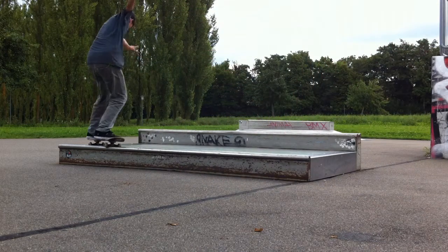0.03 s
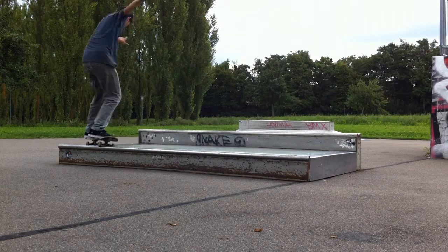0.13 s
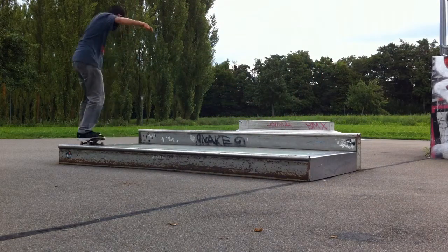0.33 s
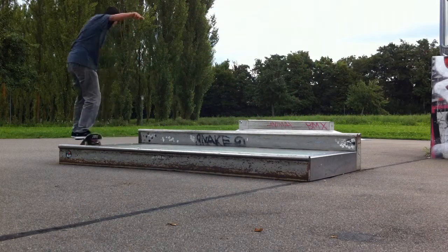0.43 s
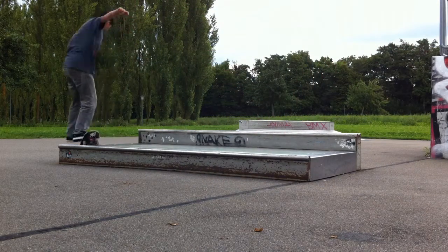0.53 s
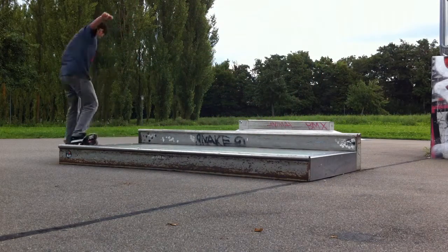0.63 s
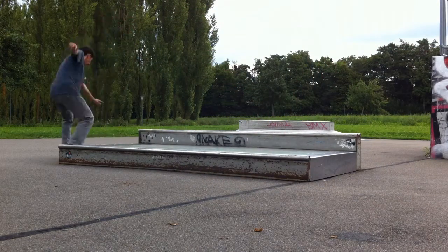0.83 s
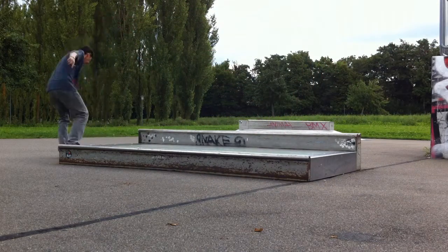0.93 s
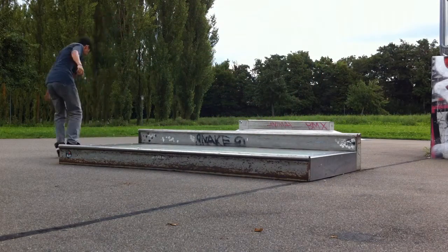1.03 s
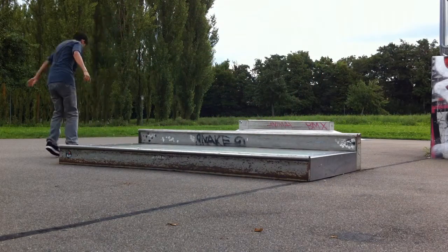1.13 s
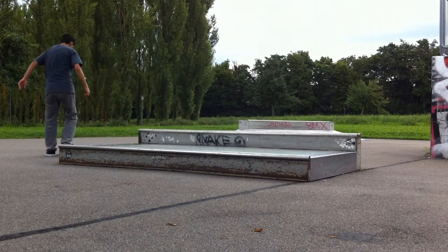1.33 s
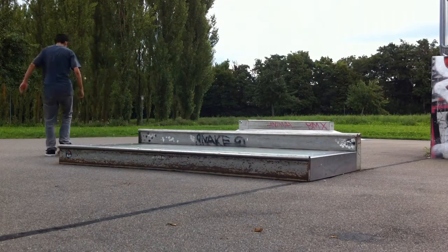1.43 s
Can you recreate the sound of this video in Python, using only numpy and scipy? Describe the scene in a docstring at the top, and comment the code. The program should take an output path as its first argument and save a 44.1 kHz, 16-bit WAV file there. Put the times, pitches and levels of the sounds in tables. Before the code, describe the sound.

Skateboard clacking and scraping along a hollow ledge, then thuds as the rider steps off.

```python
"""An open skatepark, the microphone several metres from a low, hollow concrete ledge.
A skateboard's trucks knock down on the edge and the ledge booms; the board scrapes on over grit,
its wheels stick and slip in a short rising squeal, and it stalls. Board and shoes clack and thud
as the rider steps off. Ramps and trees return a dull echo; a faint hiss lies under everything."""
import sys
import numpy as np
from scipy import signal
from scipy.fft import rfft, irfft
from scipy.io import wavfile
from scipy.ndimage import uniform_filter1d

SR = 44100
rng = np.random.default_rng(int(sys.argv[2]) if len(sys.argv) > 2 else 0)


def transcribe(signal):
    """Save signal, clipped to [-1, 1], as a 16-bit WAV file at the path in sys.argv[1]."""
    frames = np.atleast_2d(signal).T
    limited = np.clip(frames, -1, 1)
    pcm = np.round(limited * 32767).astype(np.int16)
    wavfile.write(sys.argv[1], SR, pcm)


N = 66150
TIME = np.arange(N) / SR
CRUNCH_TOP_HZ = 2880   # upper edge of the clacks' tick and of the grit

# Board and shoes hitting the ledge: t/s, clack level/dB, boom level/dB, boom centre f/Hz,
# deck ring f/Hz, ring re clack/dB, clack top f/Hz, rattle trim/dB, rattle t60/s
KNOCKS = [(0.001, -54, -53, 149, 1050, -7, 1500, 6, 0.11),
          (0.2316, -36, -37, 300, 845, 2, 1390, 2.5, 0.069),
          (0.2429, -34, -58, 282, 1030, -1, 1170, 7.5, 0.073),
          (0.2534, -34.5, -32.5, 285, 686, -5, 755, -16, 0.065),
          (0.2859, -33, -28.5, 286.6, 703, 11, 1450, 3.5, 0.1),
          (0.2916, -40, -27.5, 324, 900, 14, 1130, 0, 0.12),
          (0.3140, -35, -31, 240, 720, 0.5, 1070, 4, 0.16),
          (0.3840, -54, -33.5, 259, 866, 16, 990, 4, 0.06),
          (0.4120, -42.5, -39.5, 280, 800, 6, 1210, -4, 0.059),
          (0.665, -63.5, -42, 142.5, 690, 5, 900, 9.5, 0.096),
          (0.736, -51, -53.5, 210, 1020, 2, 1310, 5, 0.032),
          (0.826, -33.5, -41.5, 303, 1065, 6, 1760, -4, 0.062),
          (0.9470, -45.5, -43.5, 228, 934, 3, 1270, 4, 0.092),
          (0.9501, -36.5, -40, 220, 1285, 11, 1370, -2.5, 0.032),
          (0.955, -38, -49, 225, 627, 5.5, 1390, -2, 0.13),
          (0.9870, -53, -50, 158, 1380, -0.5, 1380, 12, 0.091),
          (1.098, -41, -57, 246, 765, -4, 1480, 5.5, 0.073),
          (1.1116, -35, -56, 377, 990, 6, 1278, -4.5, 0.047),
          (1.138, -47, -43, 220, 650, 9, 1180, 0, 0.044),
          (1.1557, -48, -51.5, 309, 950, -8, 1475, -10, 0.06),
          (1.1811, -45, -71, 303, 532, 5.5, 1410, 2.5, 0.1),
          (1.189, -42.5, -43.5, 181, 1280, 5, 1300, -3, 0.075),
          (1.2078, -49.5, -57, 180, 740, 13, 1170, 2.5, 0.054)]
def clacks():
    """Each hit is a sharp pulse and a dying rattle of the board's parts; both ring the deck briefly."""
    rattle_db, tick_db, ring_width_hz = -17.5, -31, 90
    out, click = np.zeros(N), signal.unit_impulse(N)
    for s, db, _, _, ring_hz, ring_db, top_hz, trim_db, rattle_t60 in KNOCKS:
        rattle = from_db(rattle_db + trim_db) * rng.standard_normal(N) * decay(rattle_t60) / 2
        force = cut(click, 430, "high") + cut(rattle, 288, "high")
        resonance = signal.iirpeak(ring_hz, ring_hz / ring_width_hz, fs=SR)
        deck = force + from_db(ring_db) * signal.lfilter(*resonance, force)
        clack = cut(deck, top_hz, "low", order=7)
        tick = from_db(tick_db) * cut(deck, CRUNCH_TOP_HZ, "low", order=4)
        pulse_peak = cut(click, top_hz, "low", order=7).max()
        add(out, s, -from_db(db) * (clack + tick) / pulse_peak)
    return out


# Modes of ledge and deck ringing together: f/Hz, relative level/dB, t60/s
LEDGE_MODES = [(135.1, -18, 0.71), (169.6, -6, 0.22), (209.5, -12, 0.2), (251.8, -8, 0.2),
               (284.5, -5, 0.24), (307.4, -15.5, 0.32), (355, -20, 0.32), (415, -16.5, 0.37),
               (457.5, -10.5, 0.31), (598.7, -4.5, 0.2), (658.6, 0.5, 0.2), (696, -3, 0.22),
               (790, -1.5, 0.2), (868, -9, 0.3), (920, -18, 0.17), (1012, -17.5, 0.62)]
def booms():
    """Each hit thuds in the deck and rings the ledge; the contact point favours modes near one pitch."""
    spread_db, off_centre_db_per_oct, thud_db = 1.5, -12, -8
    out = np.zeros(N)
    chance_db = spread_db * rng.standard_normal((len(KNOCKS), len(LEDGE_MODES)))
    for k, (hz, mode_db, t60) in enumerate(LEDGE_MODES):
        strikes = np.zeros(N)
        for (s, _, boom_db, centre_hz, *_), uneven_db in zip(KNOCKS, chance_db[:, k]):
            focus_db = off_centre_db_per_oct * np.abs(np.log2(hz / centre_hz))
            strikes[int(s * SR)] += from_db(boom_db + mode_db + focus_db + uneven_db)
        out += ring(strikes, hz, t60) / 2
    for s, _, boom_db, centre_hz, *_ in KNOCKS:
        thud = ring(signal.unit_impulse(N), centre_hz, t60=.09)
        add(out, s, from_db(boom_db + thud_db) * thud)
    return cut(out, 1300, "low", order=3)   # urethane softens the contact


# Wheels and trucks rubbing along the ledge: t/s, level/dB, centre f/Hz
RUB_CURVE = [(0, -61.5, 186), (.08, -72, 213), (.21, -70, 205), (.26, -54.5, 267), (.33, -43, 238),
             (.46, -48.5, 273), (.52, -54, 173), (.61, -59, 176), (.645, -64, 185), (.70, -60, 146),
             (.735, -66, 168), (.77, -60, 138), (.81, -59.5, 154), (.925, -65, 184), (1.0, -52, 152),
             (1.06, -57, 154), (1.10, -56.5, 161), (1.19, -61.5, 171), (1.23, -68, 157), (1.29, -72, 155),
             (1.33, -80, 238), (1.5, -74.5, 220)]
def rumble():
    """Rough concrete under the board keeps the ledge's modes rumbling, damped by the rider's weight."""
    off_centre_db_per_oct, floor_db = -21.5, -37.5
    level_db, centre_hz = in_time(RUB_CURVE)
    bumps = np.tile(grains(per_s=900, spread_db=3.5), 2)   # the first half lets the ringing build up
    body = np.zeros(N)
    for hz, db, _ in LEDGE_MODES:
        focus_db = np.maximum(off_centre_db_per_oct * np.abs(np.log2(hz / centre_hz)), floor_db)
        body += from_db(db + focus_db) * unit_rms(ring(bumps, hz, t60=.1)[N:])
    steady = body / np.sqrt(uniform_filter1d(body ** 2, size=1800) + 1e-20)
    waver_db = -0.5 * drift(rate_hz=22.8)
    return from_db(level_db + waver_db) * steady


# The trucks' scrape along the edge: t/s, level/dB
SCRAPE_CURVE = [(0, -58), (.07, -82.5), (.2, -83), (.225, -62.5), (.30, -45.5), (.36, -59), (.45, -58.5),
                (.53, -61.5), (.62, -83), (.72, -72.5), (.92, -75), (1.07, -90), (1.125, -50), (1.17, -60),
                (1.24, -86), (1.32, -82.5), (1.5, -75)]
# Its spectrum: f/Hz, relative level/dB
SCRAPE_SPECTRUM = [(60, -54), (130, 6), (330, 0.5), (500, 4.5), (800, -1), (1250, -3.5), (1650, -26),
                   (1970, -14), (2400, -27.5), (5000, -31), (12000, -68)]
def scrape():
    """Grit is crushed between the trucks and the edge in a dense stream of tiny clicks."""
    level_db, = in_time(SCRAPE_CURVE)
    return from_db(level_db) * coloured(grains(per_s=1800, spread_db=4.0), SCRAPE_SPECTRUM)


# Steps of the wheels' squeal: t/s, length/s, first f/Hz, last f/Hz, level/dB
SQUEALS = [(0.4, 0.034, 780, 741, -52.5), (.42, 0.0643, 554.4, 630, -50), (0.47, 0.033, 676, 711, -52.5),
           (0.496, 0.049, 767, 853, -56), (0.538, .1, 817.5, 784, -69.5)]
def squeal(start, length, from_hz, to_hz, level_db):
    """A wheel dragged sideways sticks and slips: a short, slightly rough glide with a weak octave."""
    fade_s, octave_db = 0.01, -20.5
    end = start + length
    glide_hz = np.interp(TIME, [start, end], [from_hz, to_hz])
    jitter = 1 + .042 * drift(rate_hz=170)
    phase = 2 * np.pi * np.cumsum(glide_hz * jitter) / SR
    tone = np.sin(phase) + from_db(octave_db) * np.sin(2 * phase)
    fade = np.clip(np.minimum(TIME - start, end - TIME) / fade_s, 0, 1)
    flutter_db = -drift(rate_hz=67)
    return fade * from_db(level_db + flutter_db) * unit_rms(tone)


# Grit under the hardest contacts: t/s, level/dB, t60/s
CRUNCHES = [(0.231, -65, 0.05), (0.286, -58, 0.13), (1.098, -63, 0.082)]
def crunches():
    """Grit crunches under a hit in a brief burst of bright noise."""
    out = np.zeros(N)
    for s, db, t60 in CRUNCHES:
        noise = cut(rng.standard_normal(N), CRUNCH_TOP_HZ, "low", order=4)
        crunch = unit_rms(cut(noise, 1300, "high"))
        add(out, s, from_db(db) * crunch * decay(t60))
    return out


# The ledge's deep note under the rider's weight: t/s, level/dB
DRONE_CURVE = [(0, -85), (.2, -81.5), (.33, -76), (.6, -80.5), (.8, -75.5), (1.1, -94), (1.3, -94),
               (1.5, -82)]
# Its spectrum: f/Hz, relative level/dB
DRONE_SPECTRUM = [(35, -12.5), (58, -13), (72, 4), (90, -12), (140, -6), (400, -49)]
def ledge_drone():
    """The hollow ledge drones faintly below its other modes."""
    level_db, = in_time(DRONE_CURVE)
    return from_db(level_db) * coloured(rng.standard_normal(N), DRONE_SPECTRUM)


def park_echo(direct):
    """Ramps and trees scatter a faint, dull echo that reaches the microphone after the direct sound."""
    delay_s, echo_db = .04, -14.5
    tail = np.zeros(N)
    scatter = rng.standard_normal(N) * decay(t60=0.54)
    add(tail, delay_s, cut(scatter / np.linalg.norm(scatter), 1200, "low"))
    return from_db(echo_db) * signal.fftconvolve(direct, tail)[:N]


# Noise floor at the microphone: f/Hz, relative level/dB
AIR_SPECTRUM = [(20, -12), (45, 5), (75, -3), (130, 7), (280, 11), (500, 6), (1000, 5), (2000, 1.5),
                (4000, 0), (8000, -1.5), (11000, -5), (15500, -0.5)]
def air_hiss():
    """Open air and the microphone's own noise make a faint, steady hiss."""
    return from_db(-69.5) * coloured(rng.standard_normal(N), AIR_SPECTRUM)


def from_db(db):
    """Decibels to gain."""
    return 10 ** (np.asarray(db) / 20)


def unit_rms(x):
    """Scale to unit power."""
    return x / np.sqrt(np.mean(x ** 2) + 1e-20)


def in_time(rows):
    """Each column of a curve, at every sample."""
    s, *columns = np.transpose(rows)
    return [np.interp(TIME, s, column) for column in columns]


def cut(x, hz, kind, order=2):
    """Butterworth low- or high-pass."""
    return signal.sosfilt(signal.butter(order, hz, kind, fs=SR, output="sos"), x + 1e-18)


def coloured(x, spectrum):
    """Give a steady sound a smooth spectrum, at unit power."""
    hz, db = np.transpose(spectrum)
    bin_hz = np.maximum(np.fft.rfftfreq(N, 1 / SR), 1)
    gain = from_db(np.interp(np.log(bin_hz), np.log(hz), db))
    return unit_rms(irfft(rfft(x) * gain, N))


def drift(rate_hz):
    """Slow random wander with unit spread."""
    return unit_rms(cut(rng.standard_normal(2 * N), rate_hz, "low")[N:])


def ring(clicks, hz, t60):
    """A unit click sets a sine of height 1 ringing."""
    radius, angle = from_db(-60 / (t60 * SR)), 2 * np.pi * hz / SR
    return signal.lfilter([0, np.sin(angle)], [1, -2 * radius * np.cos(angle), radius ** 2], clicks + 1e-18)


def decay(t60):
    """Exponential fall from 1, by 60 dB in t60 seconds."""
    return np.exp(-np.log(1000) * TIME / t60)


def grains(per_s, spread_db):
    """Random tiny contacts of uneven size."""
    contacts = (rng.random(N) < per_s / SR) * rng.choice([-1, 1], N)
    return contacts * from_db(spread_db * np.minimum(rng.exponential(1, N), 4))


def add(out, s, sound):
    """Mix a sound in from time s."""
    start = int(s * SR)
    out[start:] += sound[:N - start]


def scene():
    """From several metres off, in mono: the board with its bass rolled off, echo, drone and hiss."""
    microphone_low_hz = 124
    board = clacks() + booms() + rumble() + scrape() + crunches()
    board += sum(squeal(*step) for step in SQUEALS)
    board = cut(board, microphone_low_hz, "high", order=6)
    hiss = air_hiss()
    return (board + park_echo(board) + ledge_drone() + hiss)[None]


def record(dry):
    """The treble is cut steeply above 15.7 kHz."""
    return signal.sosfilt(signal.ellip(10, .1, 70, 15700, fs=SR, output="sos"), dry)


dry = scene()
out = record(dry)
transcribe(out)
```